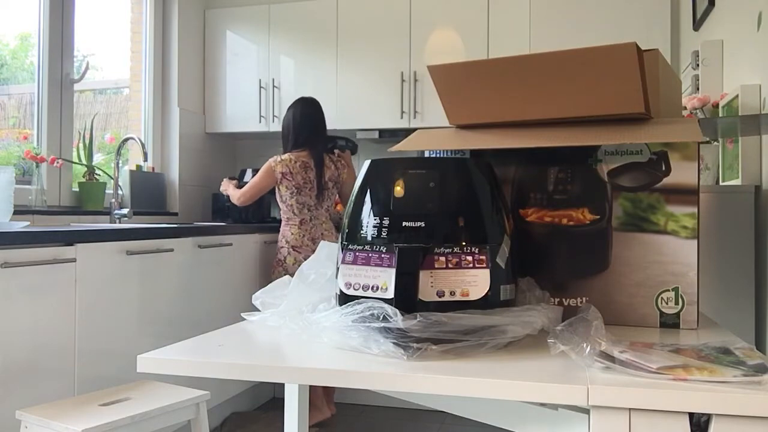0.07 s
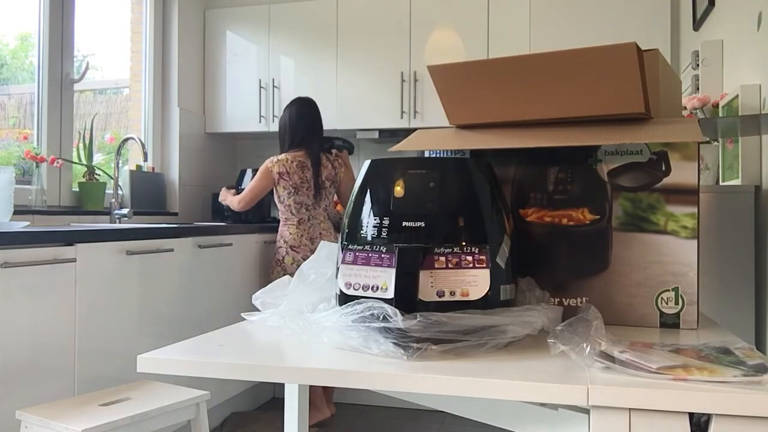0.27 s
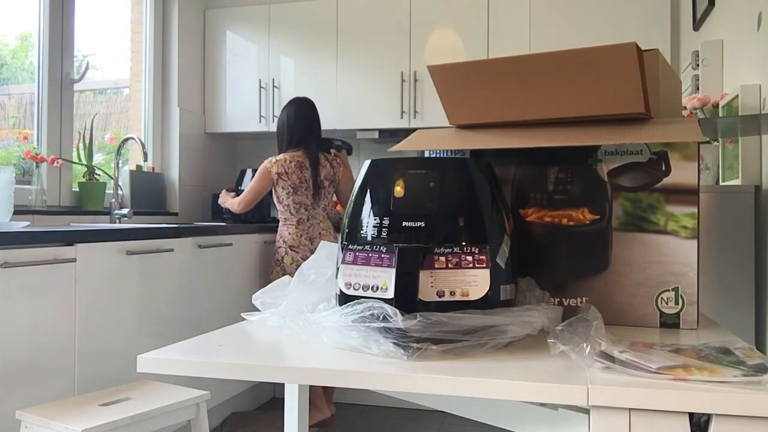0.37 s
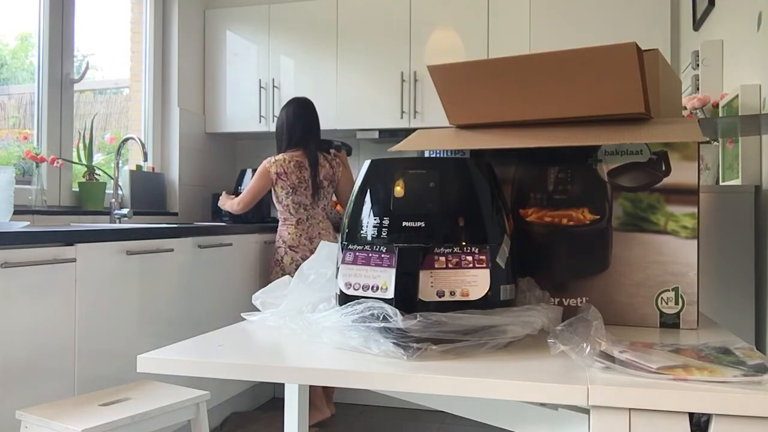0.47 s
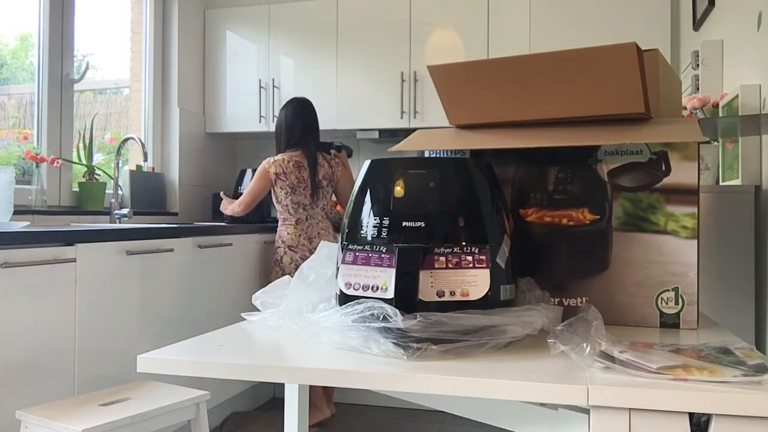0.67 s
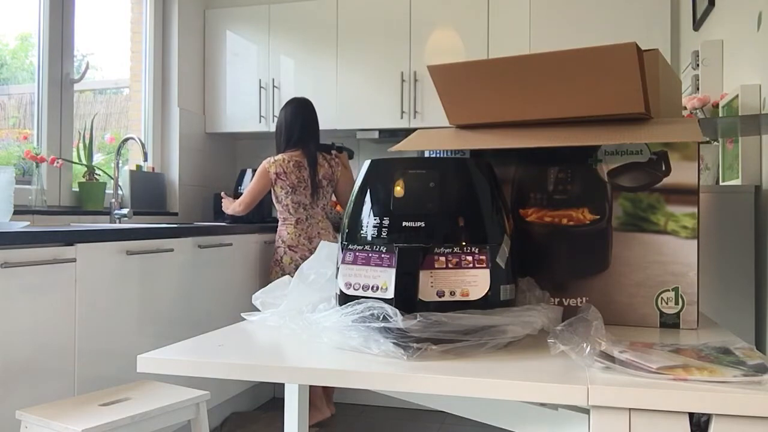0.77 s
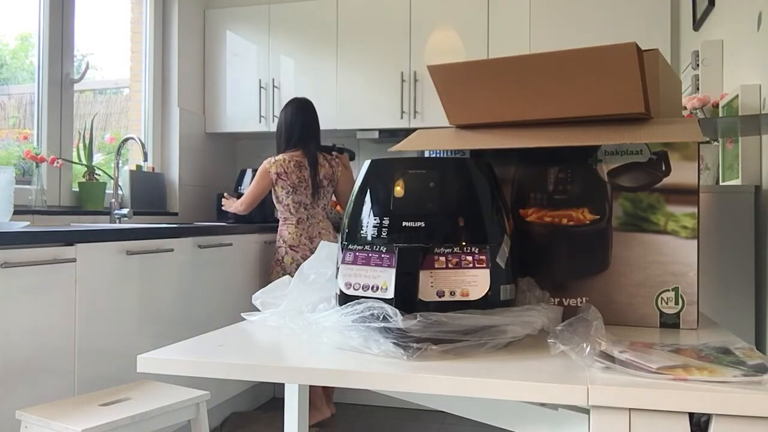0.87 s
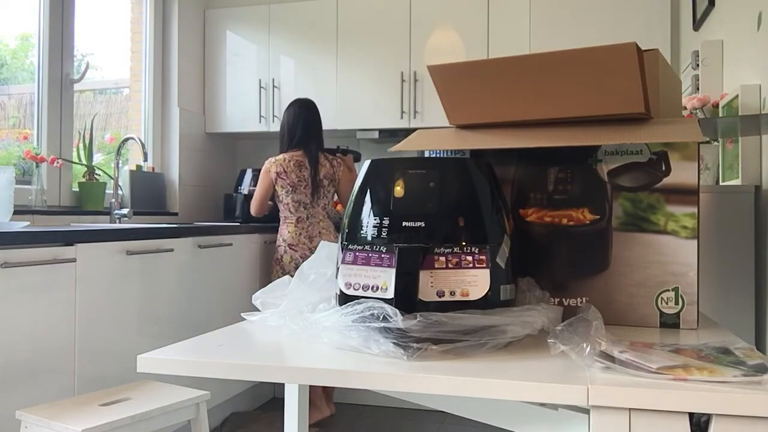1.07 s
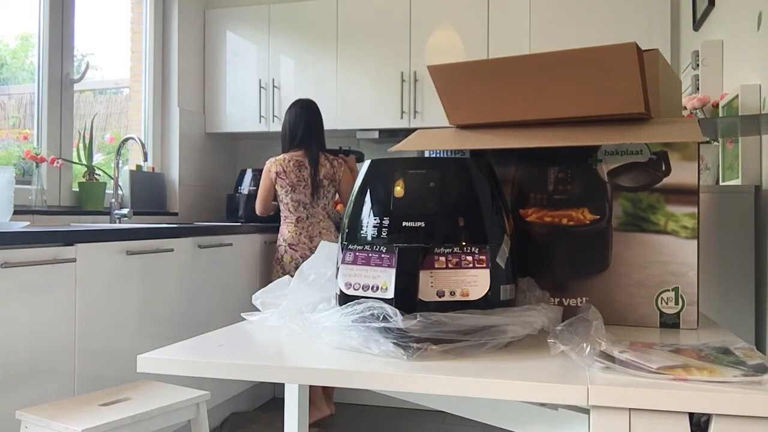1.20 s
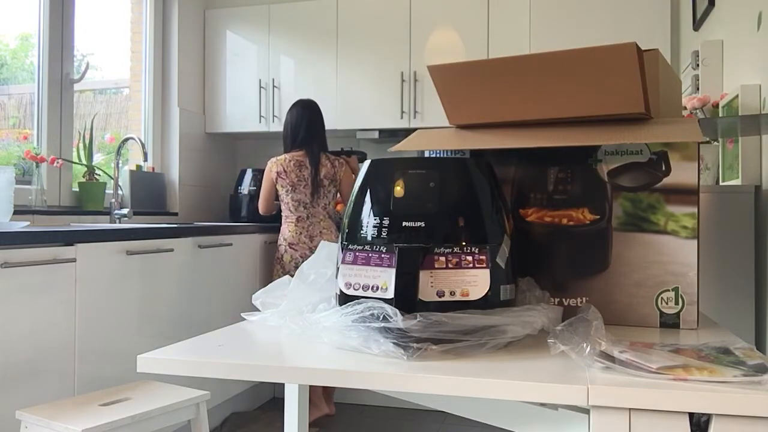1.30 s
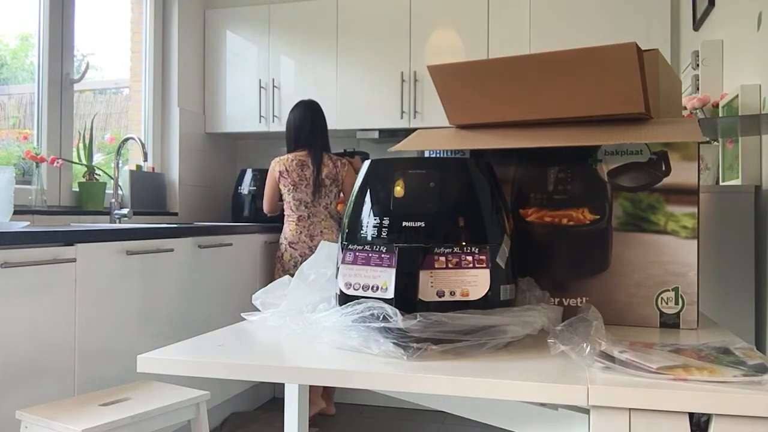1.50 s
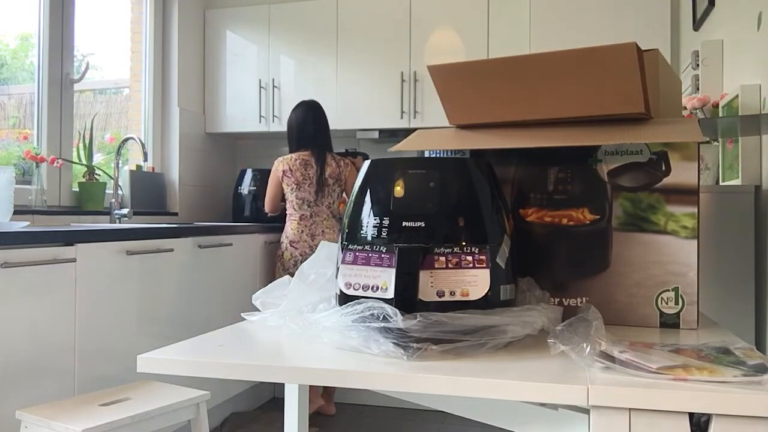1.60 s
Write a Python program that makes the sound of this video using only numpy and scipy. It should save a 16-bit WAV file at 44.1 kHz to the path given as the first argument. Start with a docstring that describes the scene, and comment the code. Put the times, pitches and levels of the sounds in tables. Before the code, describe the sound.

An air fryer drawer snaps out of its catch and its metal basket rattles. A hollow knock follows, plastic slides softly, and the drawer clacks shut, heard from a few metres away in an echoing kitchen.

```python
"""The drawer of a countertop fryer snaps out of its catch, its metal basket rattling.
The hollow shell knocks, plastic slides on plastic, and the drawer is pushed shut with a clack;
the counter thumps under it. It is all heard from a few metres across a hard-walled kitchen,
so each contact rings its body and sets off a wash of noise that swells and dies with the room."""
import sys
import numpy as np
from scipy import signal
from scipy.fft import irfft
from scipy.io import wavfile
from scipy.ndimage import uniform_filter1d

SR = 44100
rng = np.random.default_rng(int(sys.argv[2]) if len(sys.argv) > 2 else 0)


def waveform_to_disk(signal):
    """Save audio, clipped to [-1, 1], as 16-bit WAV at the path in sys.argv[1]."""
    frames = np.transpose(np.atleast_2d(signal))
    scaled = np.clip(frames, -1, 1) * 32767
    samples = np.round(scaled).astype(np.int16)
    wavfile.write(sys.argv[1], SR, samples)


N = 72765
TIME = np.arange(N) / SR


def from_db(db):
    """Decibels to gain."""
    return 10 ** (np.asarray(db) / 20)


def at_hz(points, hz):
    """Read a curve on a log-frequency axis."""
    points = np.array(points)
    return np.interp(np.log(hz), np.log(points[:, 0]), points[:, 1])


def noise_bands(colour, modes=(), lift_db=0, count=22):
    """Coloured noise of total power 1, lifted around the modes: centres in Hz and steady bands."""
    ripple_db, ripple_width_hz = 2.15, 30  # countless weak resonances make the spectrum uneven
    hz = np.maximum(np.arange(N // 2 + 1) * SR / N, 1)
    edges = np.geomspace(120, 16500, count + 1) - 100
    ripple = uniform_filter1d(rng.standard_normal(len(hz)), int(ripple_width_hz * N / SR))
    near_mode = np.zeros(len(hz))
    for centre, _, _ in modes:
        half_width_hz = 41 * np.sqrt(centre / 1e3)
        near_mode = np.maximum(near_mode, 1 / (1 + ((hz - centre) / half_width_hz) ** 2))
    gain = from_db(at_hz(colour, hz) + ripple_db * ripple / ripple.std() + lift_db * near_mode)
    spectrum = gain * np.exp(2j * np.pi * rng.random(len(hz)))
    bands = []
    for low, high in zip(edges, edges[1:]):
        band = irfft(spectrum * (hz >= low) * (hz < high), N)
        window_s = max(1.5 / (high - low), .008)
        power = uniform_filter1d(band ** 2, int(SR * window_s), mode="wrap")
        bands.append(band * np.sqrt(power.mean() / (power + 1e-30)))  # hold the level steady
    bands = np.array(bands)
    return np.sqrt(edges[1:] * edges[:-1]), bands / bands.sum(0).std()


def strike(hits, colour, modes, wash_db, lift_db, decay_scale=1.0):
    """Each hit feeds the body's modes and sets off a dense wash that swells and dies with the room."""
    # Hits. Each row: start in seconds, level in dB, tilt in dB per octave, ring in dB, swell in seconds.
    # Colour of the wash. Each row: frequency in Hz, spectral level in dB.
    # Modes. Each row: frequency in Hz, level in dB, T60 in seconds.
    # The kitchen's reverb. Each row: frequency in Hz, T60 in seconds.
    room_t60 = [(60, 0.46), (200, 0.51), (530, .4), (1400, .43), (3700, 0.5), (9700, 0.36), (15000, 0.29)]
    early_db, early_t60_s = -11.5, 0.25  # first reflections off the nearby cupboards
    centres, bands = noise_bands(colour, modes, lift_db)
    hz, mode_db, t60 = np.transpose(modes)[:, :, None]
    t = TIME[:N // 2]
    rings = from_db(mode_db - 60 * t / t60)
    tails = from_db(-60 * t / (decay_scale * at_hz(room_t60, centres)[:, None]))
    tails *= 1 + from_db(early_db - 60 * t / early_t60_s)
    pivot_octave = np.average(np.log2(centres), weights=bands.var(1))
    wash, energy = np.zeros(N), np.zeros((len(modes), N))
    for start_s, db, tilt, ring_db, swell_s in hits:
        start, pick = int(start_s * SR), rng.integers(N // 2)
        when, part = slice(max(start, 0), start + len(t)), slice(max(-start, 0), N - start)
        rise = from_db(db) * (1 - np.exp(-(t / swell_s) ** 2))
        band_gains = from_db(wash_db + tilt * (np.log2(centres) - pivot_octave))
        mode_gains = from_db(ring_db + tilt * (np.log2(hz) - pivot_octave))
        burst = band_gains @ (bands[:, pick:pick + len(t)] * tails)
        wash[when] += (rise * burst)[part]
        energy[:, when] += (rise * rings * mode_gains)[:, part] ** 2
    tones = np.sin(2 * np.pi * (hz * TIME + rng.random(hz.shape)))
    return wash + (np.sqrt(energy) * tones).sum(0)


def counter_thumps():
    """The counter takes the weight and booms in its low modes."""
    # Thumps, their dull wash and the counter's modes, with columns as in strike().
    thumps = [(-.03, -54, -2, 4.5, .005), (.21, -47, -7, 8, 0.0079), (.378, -52, -0.5, 13, 0.015),
              (.52, -52.5, -7, 8.5, 0.016), (.635, -41, 3, 2.5, 0.0084), (1.301, -49, -3.5, 8, 0.0075),
              (1.451, -32.5, 3.5, 2, 0.0046), (1.595, -49, 3.5, 9, 0.012)]
    colour = [(25, -22), (45, -7), (80, 0.5), (150, -5.5), (215, -15.5), (320, -2), (480, -15), (750, -18),
              (1500, -30), (4000, -79)]
    modes = [(62.07, -7.5, 0.8), (106, -2.5, .45), (155.5, -8.5, 0.31), (306, -14, 0.17),
             (412, -13.5, 0.39)]
    return strike(thumps, colour, modes, wash_db=-3, lift_db=10)


def shell_knocks():
    """The drawer knocks down and its shell rings hollowly."""
    # Knocks, their boxy wash and the shell's modes, with columns as in strike().
    knocks = [(-.02, -35, -1, -2.5, .004), (.07, -57, -7, 3.5, 0.01), (.38, -31, 2, -10, 0.005),
              (.5, -44.5, -1.5, 7.5, 0.0084), (.617, -27.5, 1.5, -19, 0.00033),
              (.6205, -18.5, 1, -1.5, 0.006), (.797, -57.5, 4.5, -8, 0.0026)]
    colour = [(140, -25), (220, -16.5), (310, 2), (480, -0.5), (600, -2.5), (800, -4.5), (1100, -6.5),
              (1600, -7.5), (2400, -11), (4000, -18.5), (6500, -22), (9000, -31), (15500, -40.5)]
    modes = [(250, -18.5, 0.62), (336, -6.5, 0.47), (371, -7.5, 0.44), (631.3, -16, 0.36), (787, -5, 0.23),
             (822, -11.5, 0.38), (835, -17, 0.38), (872, -12.5, 0.53), (1060, -14.5, .42),
             (1336, -16, 0.47), (1432, -14, 0.48), (1580, -21, 0.62), (1655, 0.5, 0.1), (1790, -16, 0.15),
             (2270, -17.5, 0.38), (2615, -21, 0.53), (3215, -18.5, 0.34)]
    return strike(knocks, colour, modes, wash_db=-4, lift_db=3)


def drawer_slide():
    """Plastic rubs on plastic: small catches, blurred by the room."""
    # The rub's fader moves. Each row: time in seconds, level in dB.
    fader = [(0, -43.5), (.18, -78), (.28, -48), (.43, -35), (.48, -44.5), (.56, -46.5), (.62, -41.5),
             (.82, -61.5), (.88, -52), (.96, -48.5), (1.07, -49.5), (1.17, -56), (1.27, -53), (1.38, -49),
             (1.55, -59), (1.65, -55.5)]
    # The rub's colour. Each row: frequency in Hz, spectral level in dB.
    colour = [(29, -25), (62, -3), (80, -8), (154, -8.5), (200, -23.5), (260, -2), (310, -9), (360, -12.5),
              (440, -2.5), (500, -10.5), (720, -3.5), (930, -0.5), (1200, -4.5), (1700, -4.5), (3000, -14),
              (4900, -24.5), (6000, -25), (9000, -36), (15500, -44)]
    catches_per_s, grain_t60_s, grain_share = 230, 0.11, 0.52
    catches = (rng.random(N) < catches_per_s / SR) * rng.exponential(1, N)
    power_decay = from_db(-60 / (grain_t60_s * SR)) ** 2
    power = signal.lfilter([1], [1, -power_decay], catches)
    grain = np.sqrt(1 - grain_share + grain_share * power / power.mean())
    level = from_db(np.interp(TIME, *np.transpose(fader)))
    _, bands = noise_bands(colour)
    return level * grain * bands.sum(0)


def room_tone():
    """The faint, steady hush of the kitchen."""
    # The hush's colour. Each row: frequency in Hz, spectral level in dB.
    colour = [(25, -10), (60, -1), (200, -7.5), (1000, -9.5), (3000, -10), (8000, -26), (15500, -36)]
    _, bands = noise_bands(colour)
    return from_db(-67) * bands.sum(0)


def basket_rattles():
    """The catch snaps and the metal basket rattles, ringing at each contact."""
    # Contacts, their bright wash and the basket's modes, with columns as in strike().
    rattles = [(.2, -19.5, 0.5, 0, 0.0063), (.221, -27, -0.5, 1, 0.0017), (.257, -31.5, 0.5, -10, 0.0022),
               (.311, -25.5, -1.5, -6, 0.0049), (.374, -30, -3, -5, 0.002), (.394, -34, -3, 0.5, 0.0079),
               (.493, -35, -4, -8.5, 0.0075), (.621, -25.5, -6, -1.5, 0.0016)]
    colour = [(150, -38), (220, -28), (260, -9.5), (330, -9), (440, 6), (520, -12), (700, 0.5), (880, 0.5),
              (1080, -5.5), (1300, -2), (1900, 2), (2200, -4.5), (2900, -4.5), (4400, -8.5), (6000, -11.5),
              (7500, -16.5), (9800, -22), (11500, -22.5), (14700, -24), (15800, -38)]
    modes = [(439.6, -4.5, 0.31), (851, -16, 0.47), (890, -22.5, 0.51), (1270, -16, 0.13),
             (1366, -15, 0.48), (1800, -11, 0.2), (1828, -6, 0.24), (1865, -8, 0.42), (1912, -15.5, 0.45),
             (2109, -23, 0.17), (2599, -3.5, 0.22), (3225, -31, 1), (3502, -11, 0.37), (3688, -17, 0.52),
             (4341, -8.5, 0.2), (4388, -12.5, 0.28), (4775, -25, 0.31), (4630, -22.5, 0.35),
             (6200, -22.5, 0.13), (6660, -35, .3), (7200, -24.5, 0.2), (11260, -25, 0.22),
             (12500, -31, 0.27)]
    return strike(rattles, colour, modes, wash_db=-2.5, lift_db=6, decay_scale=0.85)


def housing_clacks():
    """The drawer meets its housing and clacks shut."""
    # Clacks, their midrange wash and the housing's modes, with columns as in strike().
    clacks = [(1.295, -46, 0.5, 1, 0.0042), (1.347, -69, 5, -10, .005), (1.4095, -33.5, 2.5, 10.5, 0.0054),
              (1.421, -27.5, -2, -16, .01), (1.456, -43, 0, -10, .004)]
    colour = [(150, -41), (300, -20), (580, -5.5), (800, -6.5), (1000, -9), (1400, -9), (1750, -1.5),
              (2200, -8.5), (3600, -11), (5000, -22), (7000, -27), (10000, -43), (13000, -42), (15500, -47)]
    modes = [(1565, -14.5, 0.25), (1642, -7, 0.17), (1782, -9.5, 0.31), (1900, -13, 0.28),
             (3400, -24, 0.31)]
    return strike(clacks, colour, modes, wash_db=-1, lift_db=1.5, decay_scale=0.92)


def scene():
    """Basket, shell, housing, counter and slide over the room tone, in mono."""
    contacts = basket_rattles() + shell_knocks() + housing_clacks() + counter_thumps()
    return (contacts + drawer_slide() + room_tone())[None]


def record(dry):
    """A steep low-pass takes off the very top."""
    cutoff_hz = 15800
    return signal.sosfilt(signal.ellip(12, .1, 80, cutoff_hz, fs=SR, output="sos"), dry)


dry = scene()
out = record(dry)
waveform_to_disk(out)
```